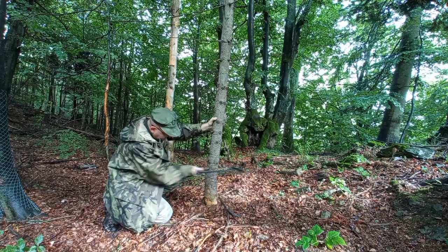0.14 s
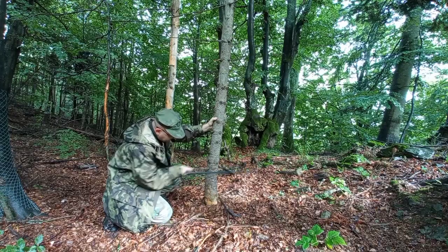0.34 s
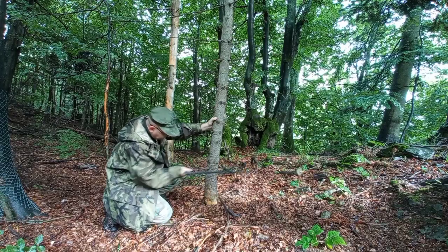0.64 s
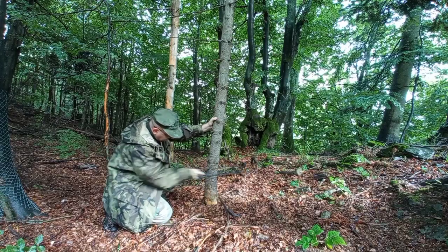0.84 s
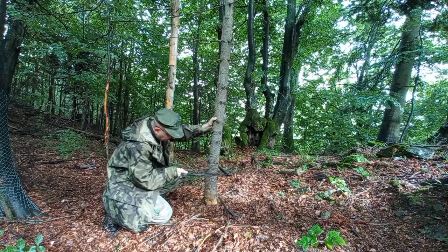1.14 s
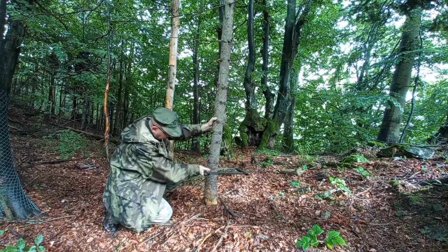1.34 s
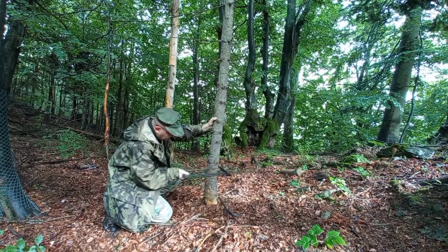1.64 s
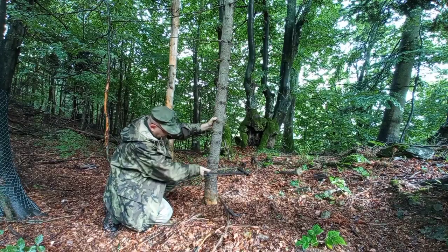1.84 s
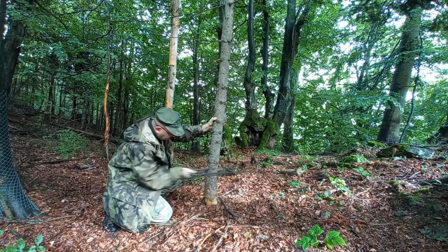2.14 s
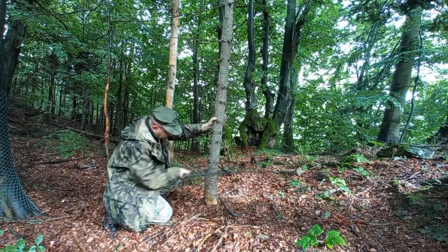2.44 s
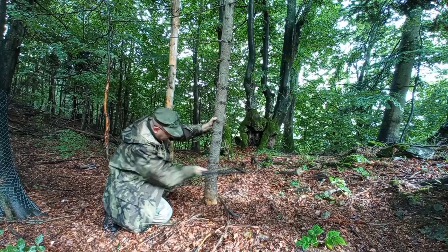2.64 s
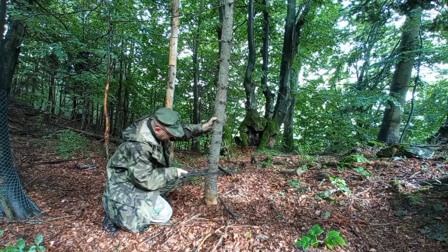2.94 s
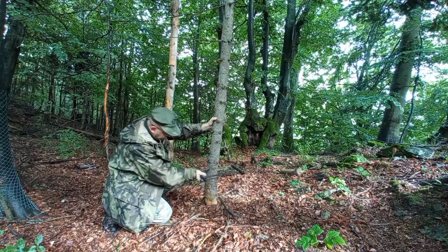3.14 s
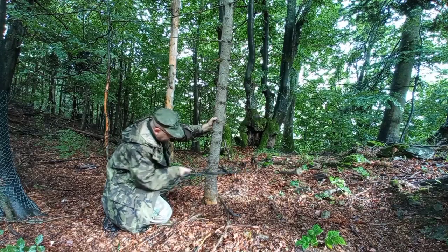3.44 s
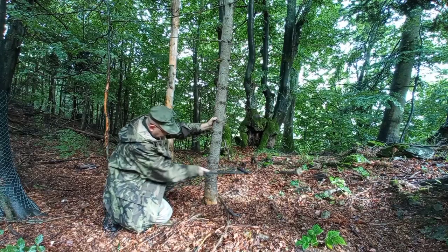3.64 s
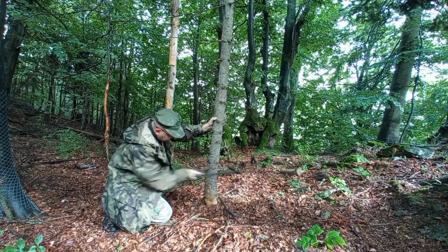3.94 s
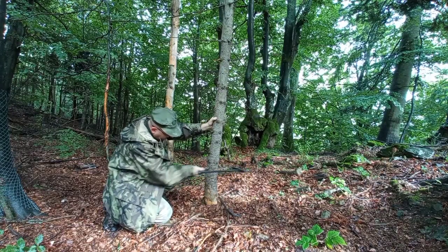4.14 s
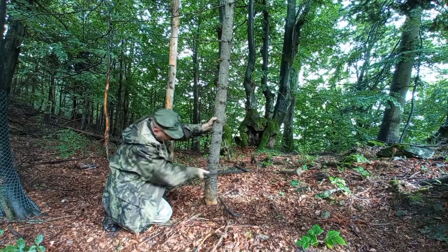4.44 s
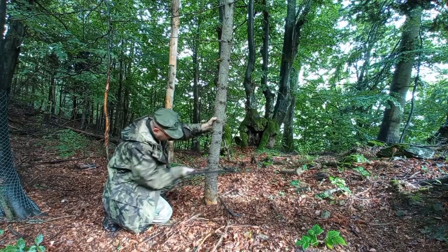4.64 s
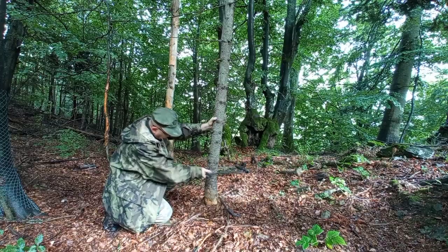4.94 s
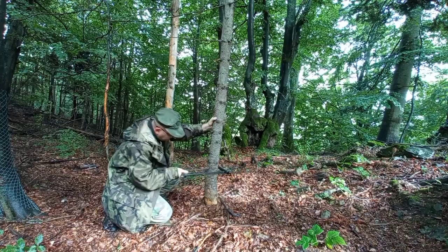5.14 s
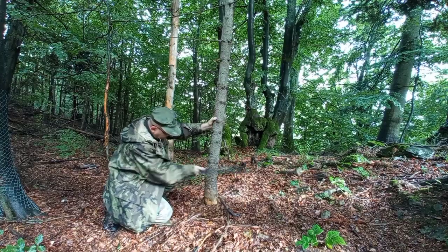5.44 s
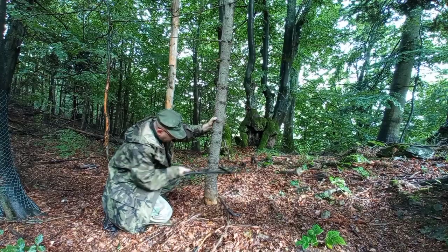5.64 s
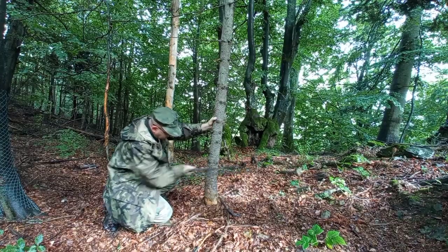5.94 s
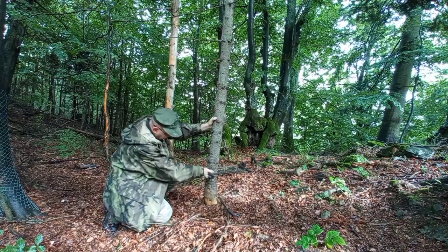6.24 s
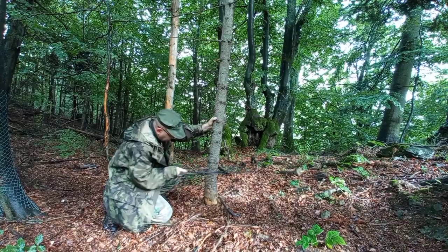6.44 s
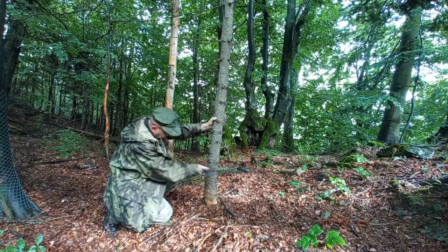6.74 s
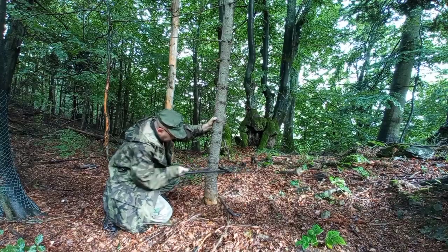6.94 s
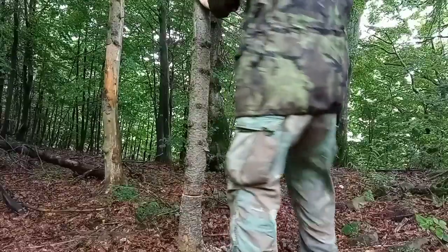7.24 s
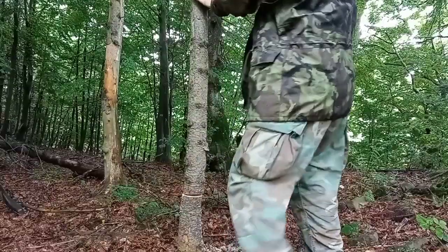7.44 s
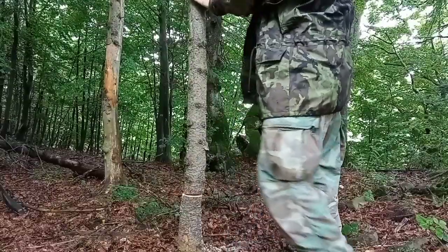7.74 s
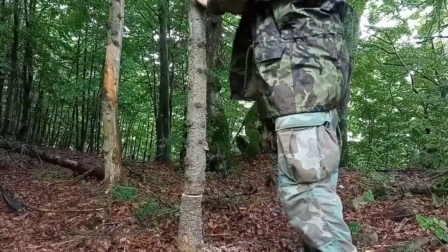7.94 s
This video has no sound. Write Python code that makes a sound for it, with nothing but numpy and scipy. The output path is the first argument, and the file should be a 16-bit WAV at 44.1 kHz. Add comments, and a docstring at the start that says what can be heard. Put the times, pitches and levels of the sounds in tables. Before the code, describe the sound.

A hand saw cuts a thin standing trunk outdoors, a bit over two strokes a second: a coarse loud pull, then a longer, much quieter push. The blade pings and judders irregularly, and fibres crack now and then. At seven seconds the sawing stops abruptly; a bright twig snap, leaf rustle and a couple of dull steps follow. One microphone a few metres off, faint woodland echo and hush.

```python
"""A hand saw works back and forth through a thin standing trunk in a forest: loud pulls, lighter pushes.
Each tooth is a burst of tiny fractures that sounds directly and rings the modes of blade and frame.
Along the way the thin blade chatters and pings, its pitch set by how tightly the kerf grips it.
Then the sawing stops and someone steps over dry leaves and twigs: damped thuds, cracks and crackling grains.
One microphone hears it all from a few metres away, with echoes off the trees and a faint steady hush."""
import sys
import numpy as np
from scipy import signal
from scipy.fft import rfft, irfft, next_fast_len
from scipy.io import wavfile
from scipy.ndimage import uniform_filter1d

SR = 44100
rng = np.random.default_rng(int(sys.argv[2]) if len(sys.argv) > 2 else 0)


def file_out(sig):
    """Save sig as 16-bit WAV at sys.argv[1]."""
    # one column per channel
    cols = np.atleast_2d(sig).T
    # limit, then scale
    lim = np.clip(cols, -1, 1)
    pcm = np.round(lim * 32767).astype(np.int16)
    wavfile.write(sys.argv[1], SR, pcm)


N = 356769
TIME = np.arange(N) / SR

# One pull and the push back. Each row: start in seconds, length of the pull in seconds, pull level in dB,
# push level in dB.
STROKES = [(-0.04, 0.17, -39.5, -51.5), (0.36, .2, -47.5, -54), (0.81, 0.2, -44.8, -53.3),
           (1.249, 0.21, -45.8, -51.3), (1.70, .205, -45, -51.3), (2.155, 0.19, -43.5, -54.5),
           (2.585, .195, -45, -53), (3.026, .195, -45, -55.5), (3.465, .215, -44, -48),
           (3.916, 0.21, -43, -51.5), (4.357, .2, -46, -52), (4.8, .21, -46.5, -49.5),
           (5.242, .21, -44.5, -49), (5.678, .215, -44.5, -47.5), (6.115, .215, -45, -47.5),
           (6.554, .2, -45, -49)]
# Bending modes of the blade. Each row: frequency when free in Hz, frequency when gripped in Hz, level in dB,
# t60 in the kerf in seconds, after-ring level in dB, after-ring t60 in seconds.
BLADE_MODES = [(1052, 1600, -7.5, 0.055, -9.5, 0.2), (2367, 3133, -1, 0.048, -11, 0.043),
               (3975, 4945, 4.5, 0.031, -13, 0.079), (6050, 6900, 3.5, 0.034, -12, 0.12),
               (8570, 9550, -0.5, 0.024, -20, 0.094), (11260, 11000, -10, 0.025, -22, 0.08)]
# Narrow resonances of the saw's frame, its stretched blade and the trunk. Each row: frequency in Hz,
# width in Hz, level in dB.
FRAME_MODES = [(168, 8.3, -31), (473, 40, -23), (765, 61, -17.5), (1070, 10, -48), (1505, 56, -18),
               (1883, 110, -9), (2080, 40, -12), (2229, 26, -16), (3100, 41, -24), (3960, 45, -19),
               (6160, 45, -15.5), (6690, 59, -17)]
# The blade sticks and judders loudly. Each row: start in seconds, length in seconds, level in dB,
# grip from 0 (free) to 1 (held).
CHATTER = [(0.042, .011, -40.5, 0.93), (0.054, 0.022, -32.3, 0.61), (0.847, 0.0063, -46.5, 0.56),
           (1.032, .019, -42, .48), (1.395, .01, -46.5, .75), (1.492, 0.016, -41, 0.51),
           (1.498, .014, -38, 0.01), (1.922, 0.016, -36, 0.48), (2.275, .012, -40, .66),
           (2.285, .016, -36, .52), (2.722, .014, -37.5, .67), (2.798, .004, -50, .45),
           (3.062, .008, -45, .4), (3.103, 0.03, -41.5, 0.69), (3.188, .01, -50.5, .3),
           (3.627, .019, -43, 0.58), (3.697, .004, -42, .38), (4.066, .009, -33, 0.28),
           (4.085, .01, -35.5, 0.55), (4.152, .007, -41.5, .6), (4.928, 0.015, -42, 0.84),
           (5.356, 0.024, -42.5, 0.85), (6.224, 0.019, -42, .84), (6.275, 0.011, -42, 0.81),
           (6.341, .004, -38, 0.95), (6.673, 0.041, -40.5, .73), (6.783, 0.0157, -34.5, 0.7)]
# A push runs in to the handle and knocks on the trunk. Each row: start in seconds, level in dB.
KNOCKS = [(0.335, -57), (2.11, -56), (2.553, -58), (3.853, -43.5), (3.886, -49.5), (5.215, -58),
          (6.065, -45.5), (6.515, -47.5), (6.97, -46.5)]
# Wood fibres and twigs crack. Each row: start in seconds, peak in dB, centre in Hz, t60 in seconds.
CRACKS = [(2.457, -42.5, 1300, 0.042), (3.725, -34.5, 1573, 0.021), (4.623, -30, 2500, 0.011),
          (4.681, -47, 2560, 0.013), (7.048, -23, 8440, .006), (7.05, -49, 6100, 0.068),
          (7.113, -46.5, 5420, 0.027), (7.331, -57, 1399, 0.048), (7.41, -51, 1040, 0.13),
          (7.875, -58, 7000, .012)]
# A heel or sole lands. Each row: start in seconds, peak in dB, brightness in dB per octave.
FOOTFALLS = [(7.048, -54.5, 0), (7.335, -60, -6), (7.867, -39.5, -2), (7.887, -36, 6.5)]
# Modes of soft ground and buried wood. Each row: frequency in Hz, level in dB, t60 in seconds.
SOIL_MODES = [(85, -14, .12), (123, -5, 0.074), (190, 0, .04), (310, -6, 0.053), (421, -2.5, 0.054),
              (550, -4, 0.031), (736, -3, 0.029), (975, -19, 0.028)]
# A boot stirs the dry leaves. Each row: moment of the peak in seconds, level in dB,
# time to fade by about 9 dB in seconds.
SCUFFS = [(7.04, -64, 0.07), (7.34, -66, 0.22), (7.5, -68, 0.14), (7.73, -75, 0.6), (7.884, -56.5, 0.04),
          (7.938, -53.5, .028)]
# Spectrum of the teeth tearing wood on a pull. Each row: frequency in Hz, relative level in dB.
PULL_COLOUR = [(40, -21), (90, -8), (160, -0.5), (330, -5.5), (750, 5), (1400, 6.5), (2000, 0.5),
               (3000, 5.5), (5600, 0.5), (8000, -4.5), (9700, 3), (12800, -22), (13900, -15.5),
               (15000, -0.5)]
# Spectrum of the teeth riding over wood on a push. Each row: frequency in Hz, relative level in dB.
PUSH_COLOUR = [(40, -24), (90, -35), (160, -11), (330, -1), (650, -9.5), (1100, 7.5), (2000, 0),
               (3000, 7.5), (6500, 3), (7700, -3), (9600, 3.5), (12800, -14.5), (13900, -24), (15500, 3.5)]
# Spectrum of rustling leaves, shared by the sleeves. Each row: frequency in Hz, relative level in dB.
LEAF_COLOUR = [(40, 4.5), (130, 0.5), (500, -4), (1000, -4.5), (2200, -1.5), (6000, -3), (7900, -8),
               (9700, 2), (12800, -27), (16000, -7.5)]
# Spectrum of the forest's hush. Each row: frequency in Hz, relative level in dB.
FOREST_COLOUR = [(30, -7), (120, 4), (400, -6), (900, -17), (4000, 8.5), (7800, 5.5), (9700, 4),
                 (13000, -7), (16000, -39)]

SAWING_ENDS_S = 7.0
PULL_FASTEST, PUSH_FASTEST = 0.508, 0.34  # share of the stroke at which the blade is fastest
BITE_S, BITE_RISE_S = 0.032, 0.0057  # the teeth skid this long after each turn, then dig in
GRIP_AT_HANDLE, GRIP_AT_TIP = 0.95, 0.618  # the kerf's hold on the blade, before it wanders
BRIGHT_AT_HANDLE_DB, BRIGHT_AT_TIP_DB = 2, -4.5  # the top of the rasp dulls as the blade runs out
SCUFF_ATTACK_S = 0.018
SLEEVES_DB, CLOTHES_DB = -67.5, -75.5  # rustle while the arm works, and afterwards
CUTOFF_HZ = 15750


def from_db(db):
    """Decibels to gain."""
    return 10 ** (np.asarray(db) / 20)


def rms_one(x):
    """Scale to an rms of 1."""
    return x / np.sqrt(np.mean(x ** 2) + 1e-20)


def add(out, s, sound):
    """Mix a sound in at time s, in seconds."""
    at = max(round(s * SR), 0)
    out[at:at + len(sound)] += sound[:max(N - at, 0)]


def drift(rate, size=N):
    """Random wander around zero: straight lines between normal random points, rate points a second."""
    knots = np.arange(size) * rate / SR
    points = rng.standard_normal(size // 40 + 2)
    return np.interp(knots, np.arange(len(points)), points)


def coloured(x, spectrum):
    """Filter a steady sound with a spectrum drawn over log frequency; rms 1."""
    hz, level_db = np.transpose(spectrum)
    size = next_fast_len(N)
    bins = np.maximum(np.arange(size // 2 + 1) * SR / size, 1)
    gain = from_db(np.interp(np.log(bins), np.log(hz), level_db))
    return rms_one(irfft(rfft(x, size) * gain, size)[:N])


def ring(force, hz, t60):
    """A damped mode driven by a force; its frequency may glide."""
    turn = np.exp(2j * np.pi * np.cumsum(hz + np.zeros(len(force))) / SR)
    decay = from_db(-60 / (t60 * SR))  # per sample
    # shift the mode down to 0 Hz, smooth there, shift back up
    envelope = signal.lfilter([1, 1], [1, -decay], force / turn + 1e-18)
    return (turn * envelope).real


def grains(per_s, spread_db):
    """Tiny fractures at random moments, of widely different sizes; rms 1."""
    sizes = from_db(spread_db * np.minimum(rng.exponential(1, N), 4)) * rng.choice([-1, 1], N)
    return rms_one(sizes * (rng.random(N) < per_s / SR))


def stroke_spans():
    """Pulls and pushes as rows of (start s, end s, level dB); each push lasts until the next pull."""
    start, pull_s, pull_db, push_db = np.transpose(STROKES)
    turn = start + pull_s
    end = np.append(start[1:], SAWING_ENDS_S)
    return np.transpose([start, turn, pull_db]), np.transpose([turn, end, push_db])


def pulls(treble_from_hz=6500):
    """The cutting stroke bites deep; the grip eases and the rasp dulls as the blade comes out."""
    spans, _ = stroke_spans()
    speed, loudness = arm(spans, PULL_FASTEST, steepness=1.65, skid_db=-4, lift_s=0.057)
    force = teeth(speed, teeth_per_s=260, bite_db=1.5, catch_db=2.6, spread_db=3.6)
    # 0 at the handle, 1 at the tip
    drawn = np.interp(TIME, spans[:, :2].ravel(), np.tile([0, 1], len(spans)))
    grip = np.interp(drawn, [0, 1], [GRIP_AT_HANDLE, GRIP_AT_TIP]) + 0.17 * drift(90)
    sound = rasp(force, speed, PULL_COLOUR, blade_db=-6.5, sing_db=5.0, frame_db=-10,
                 grip=grip, slow_cut_hz=290)
    lows = signal.sosfiltfilt(signal.butter(2, treble_from_hz, fs=SR, output="sos"), sound)
    treble_db = np.interp(drawn, [0, 1], [BRIGHT_AT_HANDLE_DB, BRIGHT_AT_TIP_DB])
    return loudness * (lows + (sound - lows) * from_db(treble_db))


def pushes():
    """On the way back the teeth ride over the wood."""
    _, spans = stroke_spans()
    speed, loudness = arm(spans, PUSH_FASTEST, steepness=1.21, skid_db=-2.5, lift_s=0.07)
    force = teeth(speed, teeth_per_s=440, bite_db=1.5, catch_db=3.0, spread_db=3.5)
    grip = 0.5 + 0.29 * drift(44)
    sound = rasp(force, speed, PUSH_COLOUR, blade_db=-28.5, sing_db=20, frame_db=-4.5,
                 grip=grip, slow_cut_hz=100)
    return loudness * sound


def arm(spans, fastest, steepness, skid_db=-5, lift_s=0.058):
    """Blade speed swells in each stroke, loudness follows its power; the teeth skid, dig in and lift off."""
    speed, loudness = np.zeros(N), np.zeros(N)
    for start, end, level_db in spans:
        t = TIME[(TIME >= start) & (TIME < end)] - start
        length = end - start
        phase = np.interp(t, [0, fastest * length, length], [0, np.pi / 2, np.pi])
        swing = np.abs(np.sin(phase))
        skid = from_db(skid_db * np.clip(1 - (t - BITE_S) / BITE_RISE_S, 0, 1))
        lift = np.clip((length - t) / lift_s, 0, 1)
        add(speed, start, swing)
        add(loudness, start, from_db(level_db) * skid * lift * swing ** steepness)
    return speed, loudness


def teeth(speed, teeth_per_s, bite_db, catch_db, spread_db):
    """Each passing tooth tears a clump of fibres; the blade catches and slips unevenly."""
    # the tooth rate scales with blade speed and jitters
    passed = np.cumsum(teeth_per_s * speed * from_db(1.4 * drift(66))) / SR
    clump_db = bite_db * np.cos(2 * np.pi * passed) + catch_db * drift(70)
    return rms_one(grains(14000, spread_db) * from_db(clump_db))


def rasp(force, speed, colour, blade_db, sing_db, frame_db, grip, slow_cut_hz):
    """Tearing fibres sound directly and shake the blade and the frame."""
    pace = np.minimum(speed, 1) ** 2
    blade = sum(from_db(db) * ring(force, free + grip * (held - free), t60)
                for free, held, db, t60, *_ in BLADE_MODES)
    # a mode's t60 follows from its width
    frame = sum(from_db(db) * rms_one(ring(force, hz, np.log(1000) / np.pi / width))
                for hz, width, db in FRAME_MODES)
    # slack sideways modes (Hz, dB) wander as the kerf slides along the blade
    slack = sum(from_db(db) * rms_one(ring(force, hz * 2 ** (0.332 * drift(16)), 0.067))
                for hz, db in [(300, -23.5), (620, -17.5), (1100, -15.0)])
    tearing = coloured(force, colour) + slack
    # slow teeth only scratch and make the blade sing: the lows need speed
    thin = signal.sosfilt(signal.butter(1, slow_cut_hz, "high", fs=SR, output="sos"), tearing)
    direct = thin + pace * (tearing - thin)
    singing = from_db(blade_db + sing_db * (1 - pace)) * rms_one(blade)
    return direct + singing + from_db(frame_db) * frame


def turns(sing_db=-74, scratch_db=-68, width_s=0.038):
    """Each time the arm reverses, the creeping blade scratches and briefly sings on its first mode."""
    turning = sum(np.exp(-((TIME - start) / width_s) ** 2) for start, *_ in np.vstack(stroke_spans()))
    force = grains(6400, spread_db=2)
    free, held, *_ = BLADE_MODES[0]
    grip = 0.72 + 0.19 * drift(14)
    sing = rms_one(ring(force, free + (held - free) * grip, 0.054))
    return turning * (from_db(sing_db) * sing + from_db(scratch_db) * coloured(force, PUSH_COLOUR))


def chatter(pull_bright_db=-4.0, push_bright_db=-1.0, slack_bright_db=11, slack_below=0.3):
    """Loud judders, duller in a pull than in a push; a barely held blade squeals on its top modes."""
    out = np.zeros(N)
    for s, length, level_db, grip in CHATTER:
        pulling = any(start <= s < start + pull_s for start, pull_s, *_ in STROKES)
        firm_bright_db = pull_bright_db if pulling else push_bright_db
        bright_db = np.interp(grip, [0, slack_below], [slack_bright_db, firm_bright_db])
        add(out, s, from_db(level_db) * judder(length, grip, bright_db))
    return out


def judder(length, grip, bright_db, wedged=False, slaps_per_s=330, slap_s=0.00058, sag=0.275,
           sag_s=0.011, wobble=0.19, scrape_db=-1.5, rub=0.13):
    """The blade slaps the kerf walls; its modes sag as the grip eases, then ring on. Wedged, it keeps pitch."""
    t = np.arange(SR // 5) / SR
    # a hard first slap, then uneven rebounds
    bounces = np.floor(np.cumsum(slaps_per_s * from_db(3.5 * drift(400, size=len(t)))) / SR)
    slaps = np.diff(bounces, prepend=0) * (t < length) * rng.uniform(1.0, 2.04, len(t))
    slaps[0] = 2
    slapping = signal.lfilter([1], [1, -np.exp(-1 / (slap_s * SR))], slaps)
    rubbing = rub * np.exp(-np.maximum(t - length, 0) / (0.88 * length))
    force = (slapping + rubbing) * rng.standard_normal(len(t))
    easing = 0 if wedged else sag * np.clip((t - 0.6 * length) / (sag_s + length / 2), -0.4, 1)
    grip_now = np.maximum(grip - easing + wobble * drift(178, size=len(t)) * (t < length), 0)
    band = signal.butter(2, [500, 7500], "band", fs=SR, output="sos")
    ping = from_db(scrape_db) * rms_one(signal.sosfilt(band, force))
    for free, held, db, t60, after_db, after_t60 in BLADE_MODES:
        struck = rms_one(ring(force, free + grip_now * (held - free), t60))
        # the after-ring: a wedged blade rings at its held pitch and dies twice as fast
        rest_hz, rest_t60 = (held, after_t60 / 2) if wedged else (free, after_t60)
        fade = from_db(-60 * t / rest_t60) * np.clip((t - length) / sag_s, 0, 1)
        after = rms_one(np.sin(2 * np.pi * rest_hz * t) * fade)
        tilt_db = bright_db * np.log2(free / BLADE_MODES[2][0])  # dB per octave around the third mode
        ping += from_db(db) * (from_db(tilt_db) * struck + from_db(after_db) * after)
    return ping / np.sqrt(np.mean(ping[t < length + 0.005] ** 2))


def shivers(dig_db=-8.5, release_share=0.76, release_db=-6, catch_s=0.033, catch_db=-4.5,
            scatter_s=0.003, scatter_db=1.5):
    """The blade shivers lightly as the teeth dig in, as the pull lets go, and as the push catches."""
    out = np.zeros(N)
    for (start, turn, pull_db), (_, _, push_db) in zip(*stroke_spans()):
        late, louder = rng.normal(0, scatter_s, 2), rng.normal(0, scatter_db, 3)
        dig = judder(0.006, grip=0.8, bright_db=-6)
        add(out, start + BITE_S, from_db(pull_db + dig_db + louder[0]) * dig)
        release = judder(0.009, grip=0.653, bright_db=-4.5)
        release_at = start + release_share * (turn - start) + late[0]
        add(out, release_at, from_db(pull_db + release_db + louder[1]) * release)
        catch = judder(0.014, grip=0.5, bright_db=-6.5)
        add(out, turn + catch_s + late[1], from_db(push_db + catch_db + louder[2]) * catch)
    return out


def knocks():
    """Each knock is one short tap on the wedged blade."""
    out = np.zeros(N)
    for s, level_db in KNOCKS:
        tap = judder(0.003, grip=0.89, bright_db=-4.5, wedged=True, scrape_db=-4)
        add(out, s, from_db(level_db) * tap)
    return out


def trunk(start_db=-75, follow=0.5, deepen_db_per_s=0.62):
    """The worked trunk thrums low, easing at each turn of the saw and growing as the cut deepens."""
    speed, _ = arm(np.vstack(stroke_spans()), PULL_FASTEST, steepness=1)
    smooth_speed = np.maximum(uniform_filter1d(speed, SR // 20), 0)
    shaking = smooth_speed ** follow * rng.standard_normal(N)
    thrum = rms_one(ring(shaking, 127, 0.073) + ring(shaking, 155.5, 0.17) + 1.1 * ring(shaking, 186, 0.065))
    return from_db(start_db + deepen_db_per_s * TIME) * thrum


def cracks():
    """Fibres and twigs snap in short dry noise bursts, each in a broad band of its own."""
    out, t = np.zeros(N), np.arange(SR // 8) / SR
    for s, peak_db, hz, t60 in CRACKS:
        band = signal.butter(2, [hz / 1.4, min(hz * 1.31, 0.45 * SR)], "band", fs=SR, output="sos")
        burst = signal.sosfilt(band, rng.standard_normal(len(t)) * from_db(-60 * t / t60))
        add(out, s, from_db(peak_db) * burst / np.abs(burst).max())
    return out


def thuds():
    """The ground gives a few damped swings under the boot: deep for the heel, harder for the sole."""
    out, t = np.zeros(N), np.arange(SR // 4) / SR
    onset = 1 - np.exp(-t / 0.00084)
    for s, peak_db, bright_db in FOOTFALLS:
        swing = np.zeros(len(t))
        for k, (hz, db, t60) in enumerate(SOIL_MODES):
            level = from_db(db + bright_db * np.log2(hz) - 60 * t / t60)
            swing += (-1) ** k * level * np.sin(2 * np.pi * hz * t)  # neighbours start in opposite directions
        swing *= onset
        add(out, s, from_db(peak_db) * swing / np.abs(swing).max())
    return out


def leaves():
    """Fine clumped grains: each scuff swells quickly and dies away, over the rustle of walking."""
    level = from_db(CLOTHES_DB) * (TIME >= SAWING_ENDS_S)
    for s, level_db, fade_s in SCUFFS:
        swell = np.exp(-np.maximum((s - TIME) / SCUFF_ATTACK_S, (TIME - s) / fade_s))
        level = np.hypot(level, from_db(level_db) * swell)
    crackle = rms_one(grains(6000, spread_db=4.5) * from_db(2.8 * drift(60)))
    return level * coloured(crackle, LEAF_COLOUR)


def squeak(s=7.71, length_s=0.13, hz=1580, arch_hz=220, level_db=-76):
    """A faint squeak between the steps: a noise-driven mode whose pitch rises and falls."""
    out = np.zeros(N)
    arch = np.sin(np.linspace(0, np.pi, int(length_s * SR)))
    tone = rms_one(ring(rng.standard_normal(len(arch)), hz + arch_hz * arch, 0.045))
    add(out, s, from_db(level_db) * np.sqrt(np.abs(arch)) * tone)
    return out


def sleeves(low_hz=400):
    """The jacket rustles lightly as long as the arm works: thinned, unsteady grains."""
    rustle = coloured(grains(8000, spread_db=4.5) * from_db(2.0 * drift(30)), LEAF_COLOUR)
    thin = signal.sosfilt(signal.butter(1, low_hz, "high", fs=SR, output="sos"), rustle)
    return from_db(SLEEVES_DB) * (TIME < SAWING_ENDS_S) * thin


def ground(x, lag_s, bounce_db):
    """The forest floor returns the sound a moment later."""
    return x + from_db(bounce_db) * np.interp(TIME - lag_s, TIME, x, left=0)


def forest(x, wet_db, t60, dull_hz):
    """Trunks all round throw back many weak, dull echoes."""
    t = np.arange(SR) / SR
    echoes = rng.standard_normal(SR) * (rng.random(SR) < 0.05) * (t > 0.008) * from_db(-60 * t / t60)
    echoes /= np.sqrt(np.sum(echoes ** 2))
    echoes = signal.sosfilt(signal.butter(1, dull_hz, fs=SR, output="sos"), echoes)
    return x + from_db(wet_db) * signal.fftconvolve(x, echoes)[:N]


def hush(level_db=-76):
    """The wood's faint steady hush is coloured noise."""
    return from_db(level_db) * coloured(rng.standard_normal(N), FOREST_COLOUR)


def scene():
    """Saw and steps among the echoing trees over the faint hush, alike in both channels."""
    blade = pulls() + pushes() + turns() + chatter() + shivers() + knocks()
    saw = ground(blade, lag_s=0.0043, bounce_db=-29) + trunk()
    near = saw + cracks() + thuds() + sleeves() + leaves() + squeak()
    return np.tile(forest(near, wet_db=-23, t60=0.72, dull_hz=4330) + hush(), (2, 1))


def record(dry):
    """The microphone loses the deep bass; the top is cut steeply."""
    dry = signal.sosfilt(signal.butter(2, 55, "high", fs=SR, output="sos"), dry)
    return signal.sosfilt(signal.ellip(10, 0.1, 70, CUTOFF_HZ, fs=SR, output="sos"), dry)


dry = scene()
out = record(dry)
file_out(out)
```